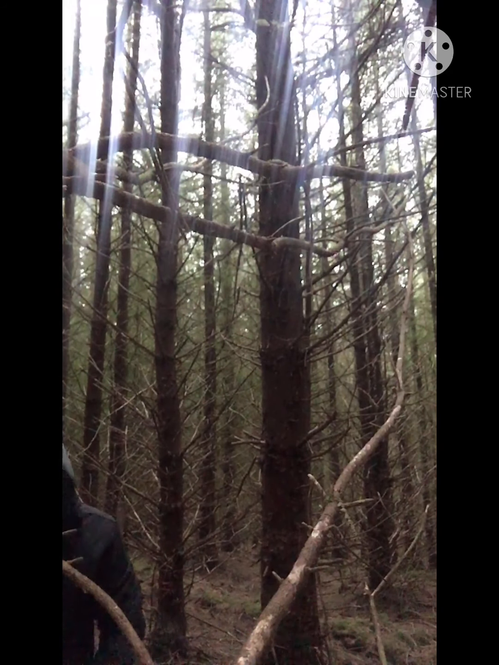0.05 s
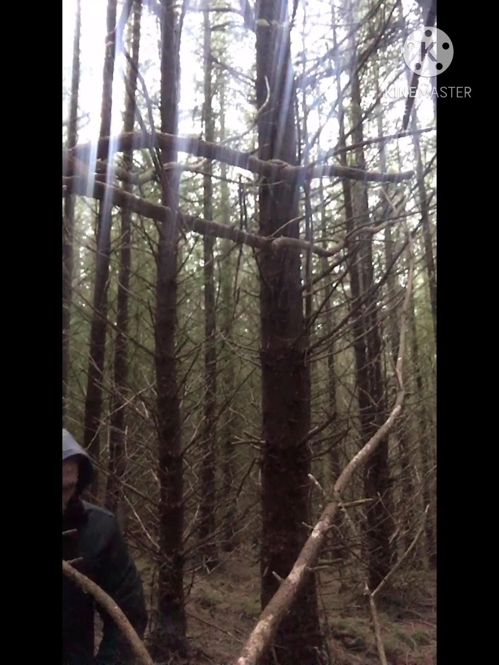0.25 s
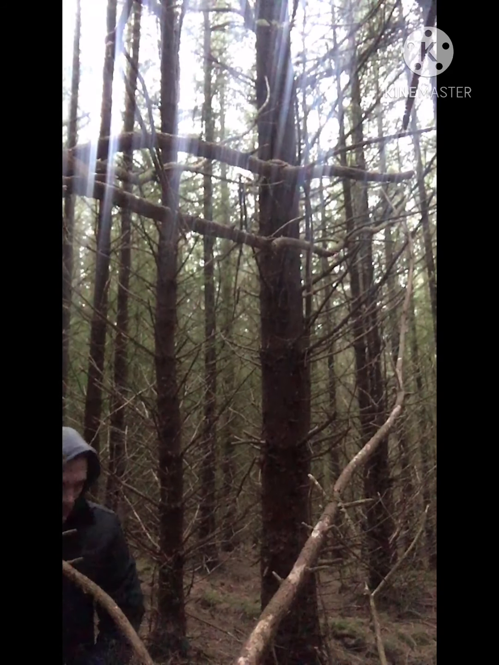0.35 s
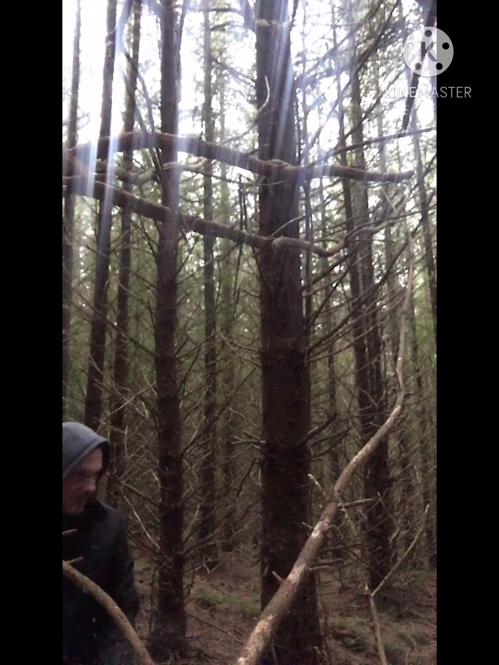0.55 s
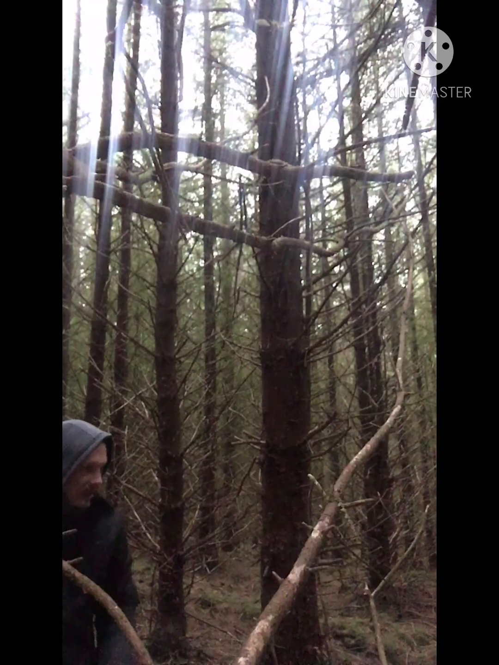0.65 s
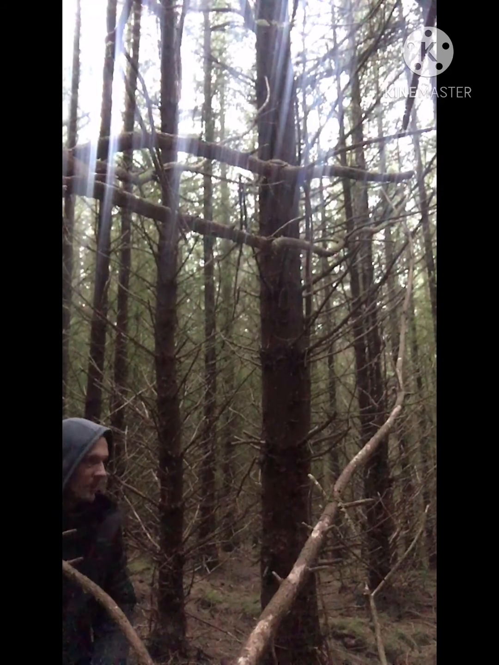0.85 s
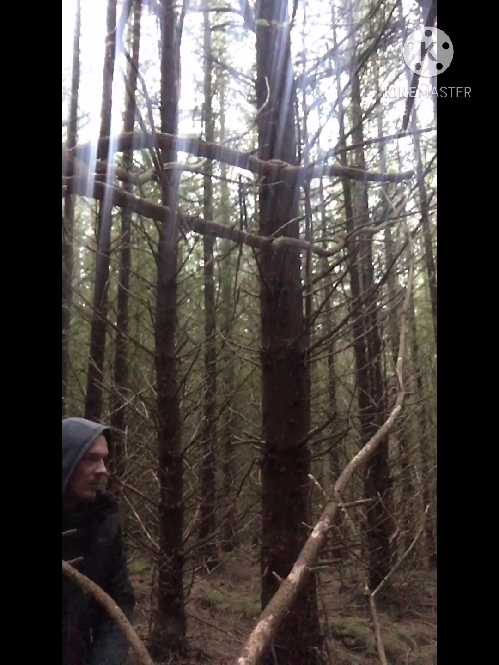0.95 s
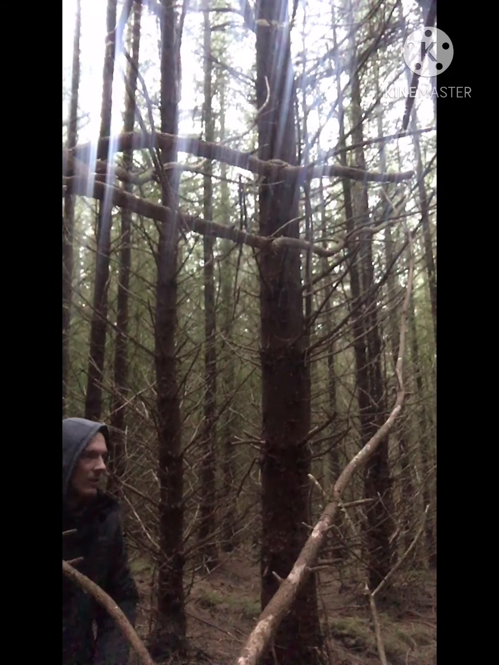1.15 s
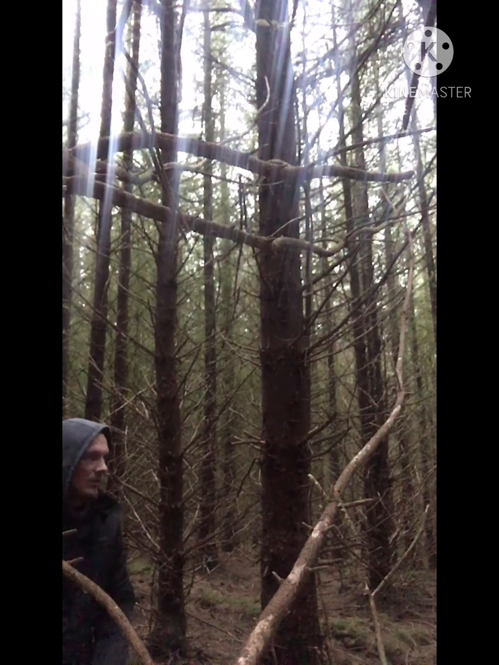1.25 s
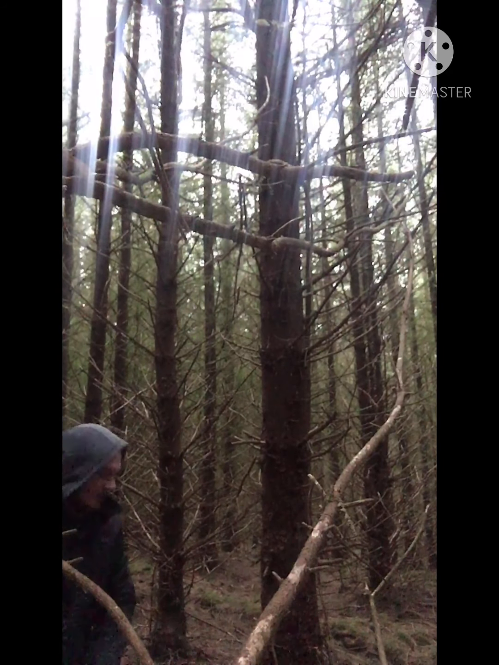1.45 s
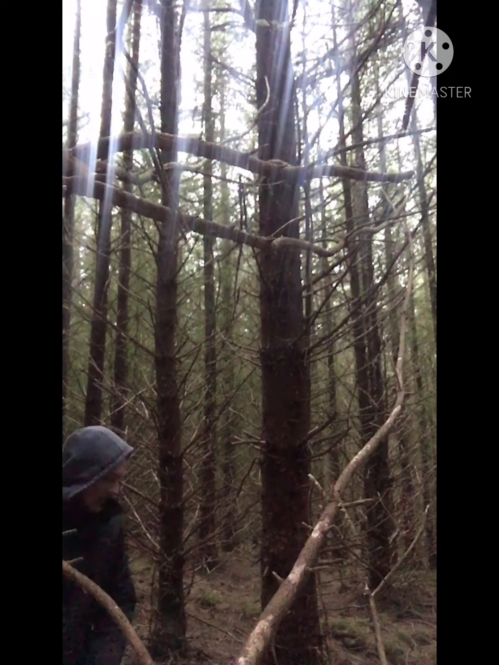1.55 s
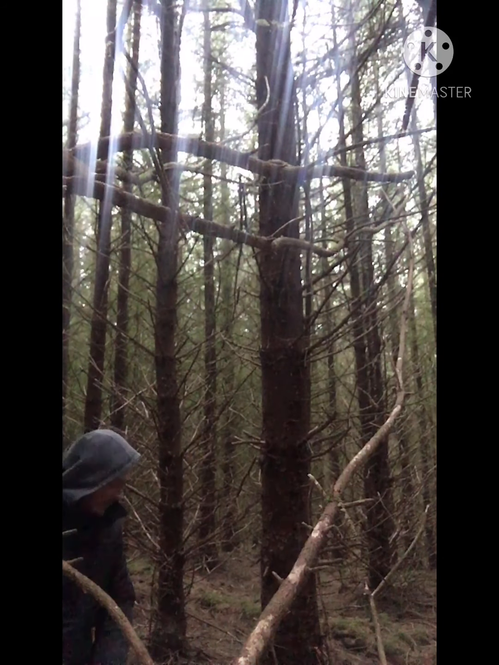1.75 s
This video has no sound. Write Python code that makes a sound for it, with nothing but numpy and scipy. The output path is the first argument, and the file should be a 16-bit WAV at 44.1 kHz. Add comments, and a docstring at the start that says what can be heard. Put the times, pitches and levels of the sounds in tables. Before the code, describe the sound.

A dry branch snaps by hand with one loud, sharp crack, echoing briefly off the trunks; a much softer twig snap, faint rustling and small wooden knocks follow in a quiet conifer forest, a few metres from the microphone.

```python
"""In a quiet conifer forest, dead twigs are snapped by hand a few metres away.
Cracks and fading fibre clicks ring decaying sine modes: a branch, then a twig, then knocks of a fallen stick.
Held wood has a dull ground bounce; banded noise following the energy gives the echo off the trunks.
A jacket and needles rustle as grainy hiss over coloured noise for the wind and an uneven distant rumble."""
import sys
import numpy as np
from scipy import signal
from scipy.fft import rfft, irfft
from scipy.io import wavfile
from scipy.ndimage import uniform_filter1d

SR = 44100
rng = np.random.default_rng(int(sys.argv[2]) if len(sys.argv) > 2 else 0)


def gain_from_db(level_db):
    """Turn a decibel level (scalar or array-like) into a linear amplitude factor."""
    decades = np.asarray(level_db, float) / 20
    return 10 ** decades


def persist_wave(psi):
    """Save psi, clipped to +-1, as 16-bit WAV."""
    counts = np.round(np.clip(psi, -1, 1) * 32767).astype(np.int16)
    wavfile.write(sys.argv[1], SR, np.atleast_2d(counts).T)


N = 79380


def shape(x, colour):
    """Filters by gain points (hz, db), interpolated over log frequency."""
    hz, gain_db = np.array(colour, float).T
    bin_hz = np.arange(len(x) // 2 + 1) * SR / len(x) + 1  # +1 avoids log 0
    gain = gain_from_db(np.interp(np.log(bin_hz), np.log(hz), gain_db))
    return irfft(rfft(x) * gain, len(x))


def unit(x):
    """Scales to rms 1."""
    return x / np.sqrt(np.mean(x ** 2))


def fall(t_s, t60_s):
    """Exponential decay by 60 dB in t60_s."""
    return np.exp(-np.log(1000) * t_s / max(t60_s, 1e-3))


def walk(points_per_s):
    """Smoothed random steps, rms 1."""
    hold = int(SR / points_per_s)
    steps = np.repeat(rng.standard_normal(N // hold + 1), hold)
    smooth = uniform_filter1d(uniform_filter1d(steps, hold), hold)
    return unit(smooth[:N])


def follow(curve):
    """Gain through points (time_s, level_db), linear in dB."""
    time_s, level_db = np.array(curve).T
    return np.interp(np.arange(N) / SR, time_s, level_db)


def wind():
    """Wind in the crowns: coloured noise with a slight slow wander of level."""
    # spectrum: pitch_hz, density_db (dB per Hz, relative)
    wind_colour = [(65, -38.5), (110, -4), (135, -3), (167, -2.5), (186, -2.5), (296, 1.5), (336, -2),
                   (382, -3.5), (935, -12), (1690, -13.5), (2440, -23), (3930, -32.5), (5000, -36),
                   (6500, -59.5), (11000, -120)]
    mean_db, wander_db = -57.5, .4
    hiss = unit(shape(rng.standard_normal(N), wind_colour))
    return gain_from_db(mean_db + wander_db * walk(1.3)) * hiss


def rumble():
    """Distant rumble: low coloured noise with an uneven level."""
    # rms level: time_s, level_db
    rumble_curve = [(0.0, -57.5), (0.896, -56), (0.946, -49), (1.162, -59.5), (1.312, -52), (1.332, -58),
                    (1.444, -48.5), (1.474, -59), (1.588, -52), (1.648, -62.5), (1.784, -50), (1.8, -59)]
    # spectrum: pitch_hz, density_db (dB per Hz, relative)
    rumble_colour = [(25, -38.5), (36, -11), (48, 3), (60, -2), (80, -3), (105, -19), (200, -59)]
    low = unit(shape(rng.standard_normal(N), rumble_colour))
    return low * gain_from_db(follow(rumble_curve))


def rustle():
    """Jacket and needles: hiss roughened by tiny random grains, following the movement."""
    # level before the wander: time_s, level_db
    movement = [(0, -76.5), (.19, -75), (0.451, -71), (.58, -77.5), (.62, -70.5), (.7, -76), (.8, -68.5),
                (.9, -58.5), (1.0, -71), (1.1, -67), (1.16, -72), (1.3, -67.5), (1.45, -65), (1.52, -70),
                (1.61, -60.5), (1.7, -72), (1.8, -76.5)]
    # spectrum: pitch_hz, density_db (dB per Hz, relative)
    rustle_colour = [(600, -7), (1500, 2), (3000, 1.5), (6000, -1), (10000, -4), (15800, -9),
                     (16300, -35.5)]
    grains_per_s, grain_spread_db, wander_db = 6000, 1.5, .8
    chance, size = rng.random((2, N))
    grains = (chance < grains_per_s / SR) * gain_from_db(-grain_spread_db * np.log(size + 1e-6))
    hiss = rng.standard_normal(N) * (1 + .4 * unit(grains))
    return unit(shape(hiss, rustle_colour)) * gain_from_db(follow(movement) + wander_db * walk(38))


def wood(modes, starts_s, breaks, rise_cycles):
    """A crack rings the modes, low ones swelling later; fading fibre clicks ring them again, off pitch."""
    fibres_per_s, tear_t60_s, fibre_detune = 6000, .015, .08
    size = 2048
    out, t = np.zeros(N + 2 * size), np.arange(size) / SR
    hz, mode_db, t60_ms = np.array(modes, float).T[:, :, None]
    sign = (-1.) ** np.arange(len(modes))[:, None]
    rise_s = rise_cycles / hz
    swell = 1 - np.exp(-(t / rise_s) ** 2)
    decay = np.exp(-np.log(1000) * np.maximum(t - rise_s, 0) * 1000 / t60_ms)
    for start_s, (level_db, top_hz, slope_db, tear_db) in zip(starts_s, breaks):
        chance, push_draw = rng.random((2, size))
        spread = fibre_detune * np.minimum(hz / 6000, 1)  # low modes stray less
        detune = 1 + spread * rng.standard_normal((2, len(modes), 1))
        tilt_db = -slope_db * abs(np.log2(hz / top_hz))
        body = gain_from_db(level_db + mode_db + tilt_db) * sign * swell * decay
        i = int(start_s * SR)
        out[i:i + size] += (body * np.sin(2 * np.pi * hz * t)).sum(axis=0)
        hit = chance < fibres_per_s / SR
        first_half = chance < fibres_per_s / SR / 2
        for side in range(2):  # each half of the clicks has its own detuning
            push = hit * (first_half == side) * (2 * push_draw - 1)
            push = push * gain_from_db(tear_db) * fall(t, tear_t60_s)
            ring = (body * np.sin(2 * np.pi * hz * detune[side] * t)).sum(axis=0)
            out[i:i + 2 * size - 1] += signal.fftconvolve(push, ring)
    return out[:N]


def branch():
    """Held branch: modes that take 3.5 cycles to swell."""
    # modes of the wood: pitch_hz, level_db, t60_ms
    branch_modes = [(561, -20.5, 24), (739, -31.5, 11), (1131, -22.5, 17), (1750, -17.5, 10),
                    (2261, -16, 10.9), (3422, -7, 3.3), (4004, -16, 9), (5630, -12.5, 4.8), (6500, -6.5, 6),
                    (8910, -4, 4.4), (9630, -1.5, 5), (12030, -10, 6.5), (14300, -21, 4), (15100, -13, 5.6)]
    # moments of the breaks: start_s
    branch_starts = [.2035, .2145, .2238, .2259, .2283, .2313, .2327, .2427]
    # breaks: level_db, brightest_hz, fall_off_db_per_octave (both ways), tearing_db (re crack)
    branch_cracks = [(-60.5, 20000, 0.5, -3), (-69, 9000, -4, -2), (-4, 9000, 2, -5.5),
                     (-10.5, 16000, 1, -9.5), (-11.5, 4400, 6.5, -21.5), (-23.5, 4500, 10, -12.5),
                     (-18.5, 4700, 11, -9), (-29.5, 15000, 3.5, -8.5)]
    return wood(branch_modes, branch_starts, branch_cracks, rise_cycles=3.5)


def twig():
    """Held twig: higher modes that swell in 2.4 cycles."""
    # modes of the wood: pitch_hz, level_db, t60_ms
    twig_modes = [(2480, -11.5, 10.3), (3670, -4.5, 3.2), (4535, -4.5, 13.7), (5500, -2.5, 8.3),
                  (6560, 1, 3.7), (7550, -19, 5), (9380, 1.5, 5.8), (11000, -8, 5.9), (12890, -8.5, 2.8),
                  (14570, -4.5, 3.1), (15800, -10.5, 3)]
    # moments of the breaks: start_s
    twig_starts = [.832, .859, .8682, .8689, .8765, .8771, 1.0592, 1.0596, 1.0624]
    # breaks: level_db, brightest_hz, fall_off_db_per_octave (both ways), tearing_db (re crack)
    twig_cracks = [(-51, 3000, 15, -1), (-48, 18000, 8.8, -3), (-27.5, 2800, 2.5, -32), (-30, 9600, 5, -4),
                   (-27, 8800, 3.7, -16.5), (-48, 10900, 7.4, 2), (-42, 18000, 5.6, 1.5),
                   (-49, 1600, 13, -3), (-70, 5600, 5.2, -5)]
    return wood(twig_modes, twig_starts, twig_cracks, rise_cycles=2.4)


def stick():
    """Fallen stick: knocks whose modes swell in under a quarter cycle."""
    # modes of the wood: pitch_hz, level_db, t60_ms
    stick_modes = [(630, -5, 20), (1130, 0, 22), (1440, -6, 16), (1900, -6, 12), (2700, -10, 7),
                   (3500, -10, 6), (4400, -12, 5), (6500, -14, 4), (10000, -16, 3), (12500, -20, 3),
                   (15000, -18, 3)]
    # moments of the knocks: start_s
    stick_starts = [1.6279, 1.633, 1.6361, 1.6403, 1.6621, 1.6646]
    # knocks: level_db, brightest_hz, fall_off_db_per_octave (both ways), tearing_db (re knock)
    stick_knocks = [(-35, 4200, 6, -14), (-40, 8000, 3, -12), (-31, 3100, 12, -16), (-46, 2500, 4, -10),
                    (-50, 2500, 1, -12), (-34, 1200, 2.2, -24)]
    return wood(stick_modes, stick_starts, stick_knocks, rise_cycles=0.23)


def ground(held):
    """Ground bounce: a delayed, lowpassed copy of wood held up."""
    lag_s, bounce_db, cutoff_hz = .0032, -8, 6020
    lag = int(lag_s * SR)
    late = np.r_[np.zeros(lag), held[:-lag]]
    return gain_from_db(bounce_db) * signal.lfilter(*signal.butter(2, cutoff_hz, fs=SR), late)


def trunks(direct):
    """Countless trunk echoes merge into noise that follows each band's decaying energy."""
    # echo: pitch_hz, level_db, t60_s
    trunk_echo = np.array([(620, -41, .5), (1480, -51, .55), (3460, -51, 0.4), (5900, -54, 0.29),
                           (9000, -62.5, .42), (15000, -55.5, 0.26)])
    near_db, near_t60_s, start_ms = 15.5, 0.033, 1.7
    t = np.arange(SR // 2) / SR
    onset = 1 - np.exp(-(t * 1000 / start_ms) ** 2)
    near = gain_from_db(near_db) * fall(t, near_t60_s)
    log_hz = np.log(trunk_echo[:, 0])
    out = np.zeros(N)
    for hz in 13400 / 2 ** np.arange(0, 5.5, .5):
        echo_db, t60_s = (np.interp(np.log(hz), log_hz, trunk_echo[:, k]) for k in (1, 2))
        narrow, wide = (signal.butter(3, [hz / ratio, hz * ratio], "band", fs=SR, output="sos")
                        for ratio in (2 ** .25, 1.5))
        decay = (fall(t, t60_s) + near) * onset
        energy = signal.sosfilt(wide, direct) ** 2
        power = np.abs(signal.fftconvolve(energy, decay ** 2)[:N])
        noise = unit(signal.sosfilt(narrow, rng.standard_normal(N)))
        out += gain_from_db(echo_db) * np.sqrt(power) * noise
    return out


def scene():
    """Breaks, ground bounce and trunk echo over rustle, wind and rumble; one channel."""
    held = branch() + twig()
    direct = held + stick()
    forest = direct + ground(held) + trunks(direct)
    return (forest + rustle() + wind() + rumble())[None]


def band_limit(x):
    """A steep low-pass at the top of the band."""
    return signal.sosfilt(signal.butter(12, 17140, fs=SR, output="sos"), x)


def record(dry):
    """Takes the finished mix at its own level."""
    return band_limit(dry)


dry = scene()
out = record(dry)
persist_wave(out)
```